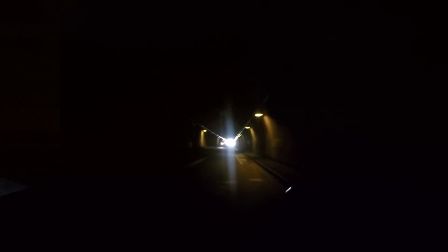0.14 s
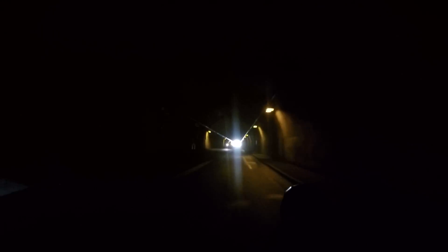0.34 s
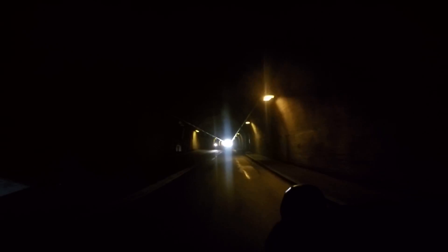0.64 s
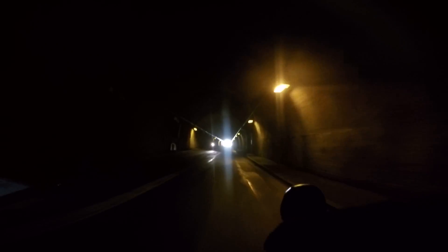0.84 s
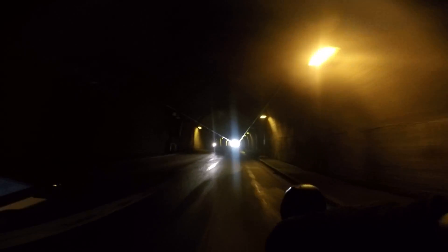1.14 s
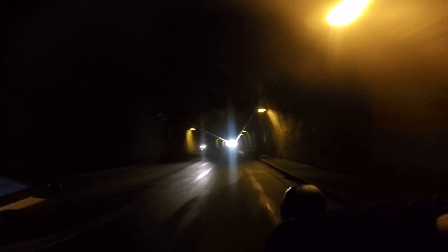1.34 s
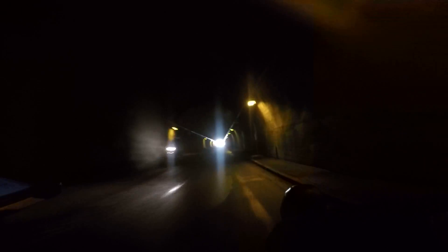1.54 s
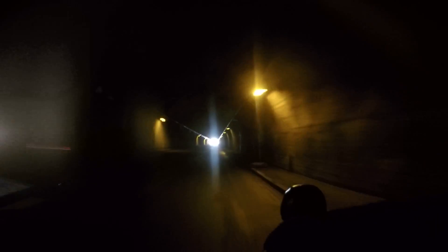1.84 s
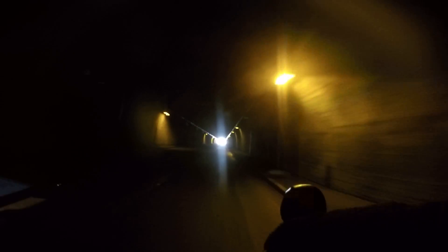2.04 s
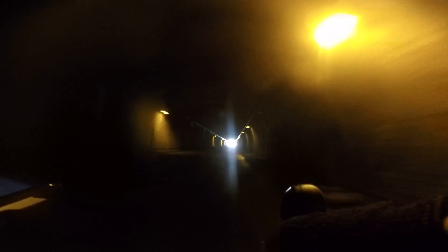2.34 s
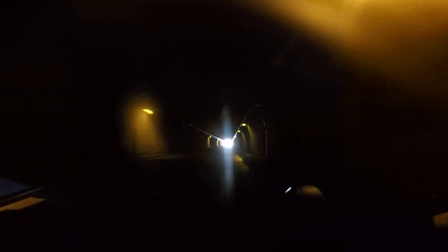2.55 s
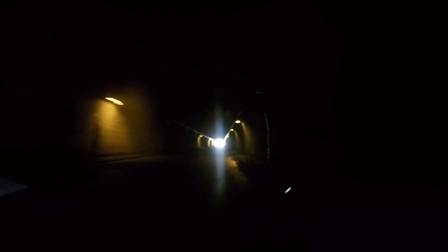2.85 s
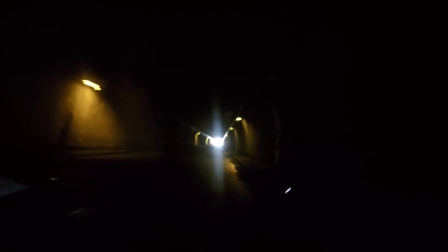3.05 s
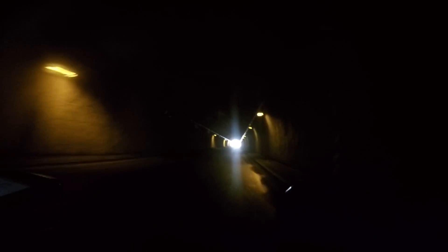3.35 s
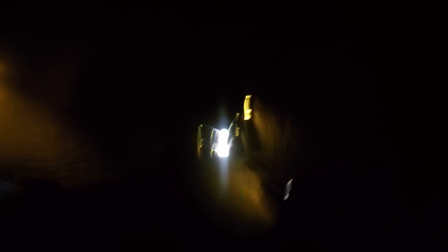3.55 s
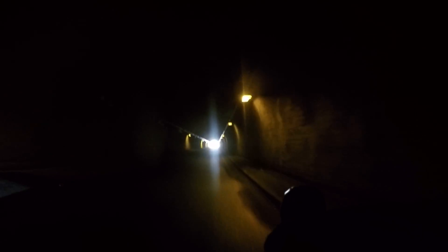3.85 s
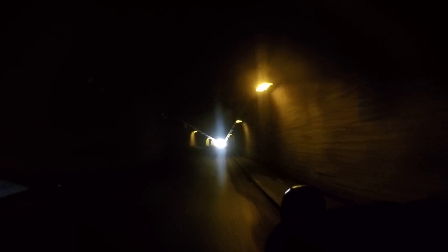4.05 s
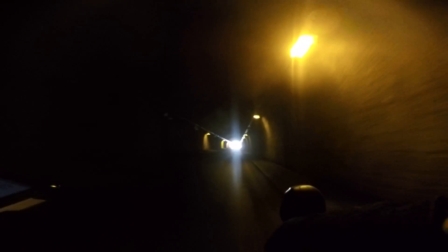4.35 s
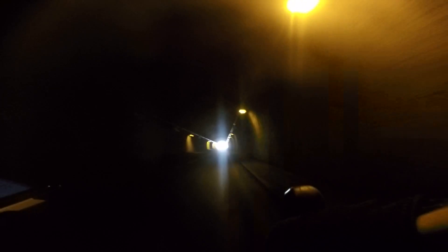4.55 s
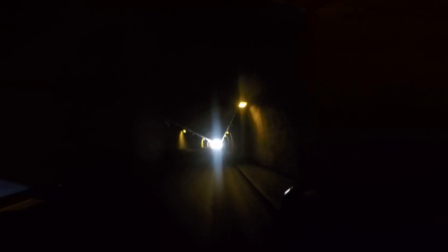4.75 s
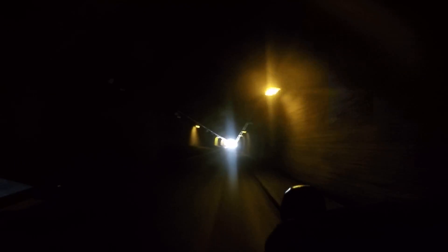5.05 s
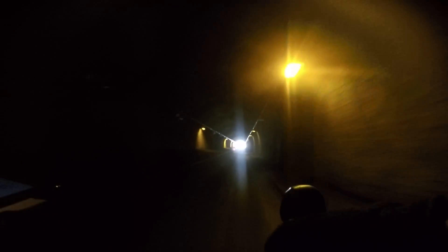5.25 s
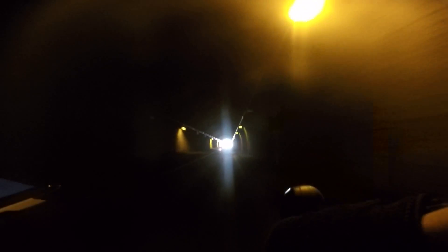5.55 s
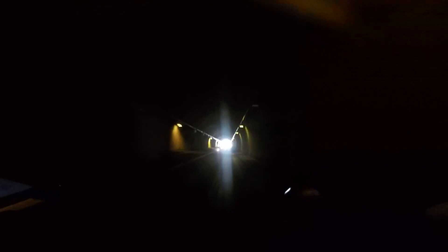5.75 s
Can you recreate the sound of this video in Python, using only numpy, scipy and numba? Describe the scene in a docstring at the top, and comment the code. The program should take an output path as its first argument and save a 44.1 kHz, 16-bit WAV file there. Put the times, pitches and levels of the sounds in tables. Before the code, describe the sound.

Close, muffled low engine shudder and hollow tunnel rumble, faint tyre hiss from oncoming cars, and one hard double clack over a bump.

```python
"""Motorcycle in a road tunnel

A motorcycle rides through a tunnel, heard from a camera in a case on the handlebar.
Noise in a roar and a boom band rings the case, with tyre hiss above it; oncoming cars add to it and sizzle.
The engine shakes the mount: a gliding low tone surges into a throb, and airy treble flares with its cycles.
Both wheels cross one bump: low swings, thumps, clacks and rattles; a gain control ducks, then recovers."""
import sys
import numpy as np
from scipy import signal
from scipy.fft import rfft, irfft, next_fast_len
from scipy.io import wavfile
from scipy.ndimage import uniform_filter1d
from numba import njit

SR = 44100
rng = np.random.default_rng(int(sys.argv[2]) if len(sys.argv) > 2 else 0)


def unload_wav(signal):
    """Save mono or channel-first audio to the path in sys.argv[1] as 16-bit WAV at rate SR, clipped to [-1, 1]."""
    wavfile.write(
        sys.argv[1],
        SR,
        np.round(np.clip(np.atleast_2d(signal).T, -1, 1) * 32767).astype(np.int16),
    )


N = 259749
T = np.arange(N) / SR  # s


def undb(db):
    """Decibels to gain."""
    return 10 ** (np.asarray(db) / 20)


def unit(x):
    """Scale to rms 1."""
    return x / np.sqrt(np.mean(x ** 2))


def colour(x, points, peaks=(), tilt_db=0):
    """Minimum-phase filter from a spectrum, resonant lifts and a tilt per octave (flat below 250 Hz)."""
    size = next_fast_len(len(x) // 2 + 2048, True) * 2
    f = np.maximum(np.arange(size // 2 + 1) * SR / size, 1)
    hz, db = np.transpose(points)
    db = np.interp(np.log(f), np.log(hz), db)
    db = db + tilt_db * np.log2(np.maximum(f, 250) / 1000)
    for centre, width, lift in peaks:
        db = db + lift * 2 ** -((2 * (f - centre) / width) ** 2)
    # folding the cepstrum makes the filter causal
    cepstrum = irfft(np.log(undb(db)))
    cepstrum[1:size // 2] *= 2
    cepstrum[size // 2 + 1:] = 0
    response = np.exp(rfft(cepstrum))
    return irfft(response * rfft(x, size))[:len(x)]


def noise(points, peaks=()):
    """Coloured noise of rms 1, already sounding at the start."""
    white = rng.standard_normal(N + SR // 4)
    return unit(colour(white, points, peaks)[-N:])


def walk(rate_hz):
    """Random levels held 1 / rate_hz s and smoothed twice; spread near 1."""
    k = int(SR / rate_hz)
    steps = np.repeat(rng.standard_normal(N // k + 1), k)
    smooth = uniform_filter1d(uniform_filter1d(steps, k), k)
    return unit(smooth[:N])


def fade(t, t60):
    """Exponential decay that starts at t = 0 and falls 60 dB in t60 s."""
    return (t >= 0) * np.exp(-np.log(1000) * np.maximum(t, 0) / t60)


def swell(s, length):
    """Bell-shaped rise and fall around time s, length wide at half height."""
    return 2 ** -((2 * (T - s) / length) ** 2)


def add(out, s, x):
    """Mix x into out from time s."""
    i = int(s * SR)
    out[i:i + len(x)] += x[:N - i]


# camera case resonances: centre_hz, width_hz, lift_db
CASE = [(131, 100, 2), (218, 24, 2), (276.5, 7.8, 3), (308.5, 22, 5.5), (372, 24, 6.5), (426, 36, 11),
        (527.5, 81, 5), (617.6, 52, 7.5), (743, 47, 5.5), (839, 20, 7.5), (1011.5, 95, 10),
        (1101.5, 75, 11), (1245, 17, 7), (1350, 17, 0), (1920, 19, 2), (2060, 298, 9.5), (2755, 130, 4),
        (3785, 200, 7.5)]
# tunnel roar spectrum: freq_hz, relative_db_per_hz
ROAR = [(40, 8), (100, -2.5), (160, -1.5), (195, -4), (240, -3.5), (340, -8.5), (680, -10.5), (900, -10),
        (1180, -19.5), (1400, -17), (1830, -27.5), (2350, -25.5), (3000, -37.5), (3600, -35.5), (4400, -42),
        (6000, -50), (15000, -67)]
# hollow tunnel boom spectrum: freq_hz, relative_db_per_hz
BOOM_BAND = [(50, -19), (100, -0.5), (150, 9), (180, 3), (260, -13), (600, -45), (5000, -96.5)]
# tyre hiss spectrum: freq_hz, relative_db_per_hz
HISS = [(1000, -14), (2700, 2.5), (3050, 1), (3600, 4.5), (4200, -6), (5600, -16.5), (6700, -16.5),
        (7000, -15), (7300, -21), (10000, -23.5), (14500, -38.5)]
# roar level without cars or flutter: time_s, level_db
ROAR_LEVEL = [(0, -29), (.6, -29), (1.15, -26.5), (1.6, -28.5), (2.2, -26), (2.4, -29), (3.35, -27.5),
              (4.2, -28.5), (5.2, -28), (5.5, -27), (5.65, -28.5), (5.83, -27)]
# boom level without drift: time_s, level_db
BOOM_LEVEL = [(0, -34), (.4, -51), (.75, -36), (1.15, -40.5), (1.6, -51), (2.5, -45.5), (2.85, -35.5),
              (3.05, -40), (3.35, -29.5), (3.7, -49), (4.2, -37), (5.0, -43), (5.5, -38), (5.89, -45)]
OWN_TYRES_DB = -71.5


def tunnel(car_hiss, car_roar, flutter_db=0.3, grain_db=1.13, drift_db=1.7):
    """Engine and tyre noise, smeared by the tunnel into roar and boom, rings the case; tyres hiss above it."""
    roar_db = np.interp(T, *np.transpose(ROAR_LEVEL))
    boom_db = np.interp(T, *np.transpose(BOOM_LEVEL))
    # hypot adds the cars in power
    roar_gain = np.hypot(undb(roar_db), car_roar)
    roar_flicker = undb(flutter_db * walk(21.785) + grain_db * walk(110))
    roar = noise(ROAR, CASE) * roar_gain * roar_flicker
    boom = noise(BOOM_BAND, CASE) * undb(boom_db + drift_db * walk(5.4))
    hiss_gain = np.hypot(undb(OWN_TYRES_DB), car_hiss)
    hiss = noise(HISS, CASE) * hiss_gain * undb(0.95 * walk(22))
    return roar + boom + hiss


# oncoming cars: abreast_s, hiss_db, roar_db (when abreast, before flicker)
CARS = [(0.3, -50, -41), (2.25, -55.5, -39)]
APPROACH_S, RECEDE_S = 2.2, 0.3  # time from half power to abreast, and back


def oncoming():
    """Hiss and roar of the passing cars as gains: they carry far ahead and are soon left behind."""
    power = 0
    for s, hiss_db, roar_db in CARS:
        distance = (T - s) / np.where(T < s, APPROACH_S, RECEDE_S)
        power = power + undb([[hiss_db], [roar_db]]) ** 2 / (1 + distance ** 2)
    return np.sqrt(power)


# top of a close car's tyre noise: freq_hz, relative_db_per_hz
SIZZLE = [(2000, -32), (4500, -5), (5600, -8), (6500, -2), (7000, 1), (7600, -4), (10000, -9), (14500, -18)]
SIZZLE_DB, SIZZLE_APPROACH_S, SIZZLE_RECEDE_S = -68.5, 0.83, .06  # times to half amplitude


def sizzle():
    """The top of a car's tyre noise is heard only close by and dies quickly once the car is past."""
    near = 0
    for s, _, _ in CARS:
        near = near + swell(s, 2 * np.where(T < s, SIZZLE_APPROACH_S, SIZZLE_RECEDE_S))
    return undb(SIZZLE_DB) * near * noise(SIZZLE)


# surges of the throb: peak_s, level_db, length_s, pitch_hz (before flutter and wander)
SWELLS = [(0.031, -11, 0.049, 37.02), (0.071, -10.0, 0.014, 39.73), (0.114, -10, 0.034, 46.9),
          (0.165, -8.5, 0.038, 45.47), (0.288, -10.5, 0.11, 44.77), (0.36, -10, 0.063, 42.76),
          (0.449, -11, 0.065, 44.81), (0.518, -15.5, 0.11, 37.7), (0.604, -11.5, 0.15, 41.44),
          (0.654, -12, 0.047, 37.6), (0.704, -15, 0.022, 36.86), (0.782, -9, 0.092, 42.33),
          (0.868, -7.5, 0.037, 43.48), (0.917, -12, 0.037, 40.48), (1.024, -10.5, 0.13, 42.03),
          (1.193, -12.5, 0.159, 45.48), (1.257, -6, 0.046, 43.28), (1.321, -16.5, 0.032, 49.05),
          (1.349, -19.5, 0.019, 42.26), (1.425, -11.5, 0.073, 46.17), (1.506, -9, 0.13, 44.58),
          (1.693, -8, 0.085, 42.47), (1.78, -10, 0.037, 43.36), (1.824, -9.5, 0.058, 43.7),
          (1.938, -9, 0.05, 47.8), (2.008, -11, 0.038, 37.97), (2.063, -8, 0.036, 42.8),
          (2.128, -8.6, 0.054, 44.34), (2.187, -9.5, 0.18, 44.72), (2.329, -12.5, 0.082, 45.82),
          (2.439, -10.0, 0.12, 42.14), (2.58, -12, 0.046, 43.79), (2.688, -8.5, 0.103, 47.11),
          (2.799, -9, 0.062, 47.6), (2.873, -12.5, 0.16, 42.24), (2.984, -9.8, 0.08, 40.24),
          (3.109, -10, 0.09, 38.04), (3.215, -12.5, 0.042, 43.1), (3.279, -13.7, 0.037, 42.3),
          (3.352, -11, 0.085, 44.15), (3.674, -11, 0.043, 40.54), (3.762, -8, 0.042, 42.55),
          (3.859, -8.5, 0.056, 38.8), (3.924, -8, 0.028, 39.03), (3.983, -10.5, 0.068, 40.34),
          (4.061, -10, 0.071, 42.33), (4.13, -7.5, 0.041, 45.4), (4.175, -7, 0.04, 46.97),
          (4.264, -8, 0.086, 40.05), (4.386, -8.5, 0.041, 44.1), (4.471, -8, 0.054, 41.53),
          (4.537, -5.5, 0.059, 37.1), (4.596, -16, 0.03, 46.83), (4.683, -6.5, 0.069, 40.7),
          (4.741, -3.8, 0.031, 41.06), (4.83, -8.5, 0.15, 41.24), (5.009, -12.5, 0.12, 45.66),
          (5.095, -9.5, 0.065, 42.14), (5.192, -7, 0.063, 40.17), (5.263, -10.5, 0.023, 43.1),
          (5.311, -11, 0.031, 41.66), (5.388, -12.5, 0.076, 39.5), (5.492, -10.5, 0.11, 44.86),
          (5.585, -7.5, 0.061, 39.25), (5.682, -14.5, 0.061, 39.85), (5.726, -15.5, 0.029, 38.8),
          (5.785, -8, 0.048, 46.1), (5.841, -7.5, 0.068, 40.3)]
# air buffeting spectrum: freq_hz, relative_db_per_hz
BUFFET = [(10, -57.5), (20, -22.5), (28, -5.5), (35, 1.5), (48, 3.5), (57, 10), (68, -4.5), (80, -16.5),
          (100, -38.5), (200, -59), (2000, -120)]
SLIP_RAD = 1.8  # phase step, ahead or behind, from one surge to the next


def throb(wander=0.029, flutter_db=1.0, buffet_db=-25):
    """The engine swings the mount in swells that beat against each other, and the air buffets it."""
    times, _, _, pitches = np.transpose(SWELLS)
    slips = SLIP_RAD * np.cumsum(rng.choice([-1, 1], len(SWELLS)))
    size = 0
    for (s, db, length, _), slip in zip(SWELLS, slips):
        size = size + undb(db) * swell(s, length) * np.exp(1j * slip)
    hz = np.interp(T, times, pitches) * (1 + wander * walk(48))
    phase = 2 * np.pi * np.cumsum(hz) / SR
    swing = np.sqrt(2) * np.imag(size * np.exp(1j * phase))
    return swing * undb(flutter_db * walk(90)) + undb(buffet_db) * noise(BUFFET)


# airy treble spectrum: freq_hz, relative_db_per_hz
AIRY_TREBLE = [(1000, -1.5), (5000, 0.5), (7000, -3.5), (10000, -5.5), (14500, -10)]


def treble_flares(shake, full_swing=.5, steepness=2.4, treble_db=-60, patchy_db=0.7):
    """Airy treble noise flares twice per cycle of the throb, stronger in wide swings up to a ceiling."""
    quadrature = np.imag(signal.hilbert(shake))  # largest at mid-swing
    drive = np.minimum(np.abs(quadrature) / full_swing, 1)
    return drive ** steepness * undb(treble_db + patchy_db * walk(40)) * noise(AIRY_TREBLE)


# wheels jolt the mount: start_s, level_db (before envelope), ring_hz, t60_s
JOLTS = [(3.43, 3, 57.8, 0.16), (3.447, 5.5, 38.23, 0.57), (3.587, 10, 33.9, 0.29)]


def jolts():
    """Front and rear wheel set the mount swinging in decaying low sines."""
    out = np.zeros(N)
    for s, db, hz, t60 in JOLTS:
        envelope = fade(T, t60) * (1 - fade(T, 0.037))
        add(out, s, -undb(db) * np.sin(2 * np.pi * hz * T) * envelope)
    return out


# loose parts buzz after each wheel: start_s, level_db (before envelope), t60_s, tilt_db_per_octave
RATTLES = [(3.457, -29.5, 0.59, 2), (3.583, -29.5, 0.24, 4)]


def rattle(swing, sharpness=2, rest=0.58, ticks_per_s=3500):
    """Loose parts tick on, louder each time the jolted mount swings through its rest position."""
    swing_phase = np.angle(signal.hilbert(swing))
    bursts = rest + np.abs(np.sin(swing_phase)) ** sharpness
    ticks = rng.standard_normal(N) * (rng.random(N) < ticks_per_s / SR)
    out = np.zeros(N)
    for s, db, t60, bright_db in RATTLES:
        buzz = unit(colour(ticks, CLACK, (), bright_db))
        out += undb(db) * fade(T - s, t60) * bursts * buzz
    return out


# mount modes left ringing: freq_hz (before scatter), relative_db, t60_s
MOUNT = [(317, 2.5, 0.12), (360, -9, 0.09), (605, -4, 0.049), (762, -2.5, .07), (990, -8.5, 0.02),
         (1415, -11, 0.046), (1806, -7.5, 0.035)]


def ring(t, scatter=0.018):
    """The mount's modes as decaying sines, slightly different in pitch at every blow."""
    out = 0
    for hz, db, t60 in MOUNT:
        mode_hz = hz * (1 + scatter * rng.standard_normal())
        out = out + undb(db) * np.sin(2 * np.pi * mode_hz * t) * fade(t, t60)
    return out


# camera body bottoms out: start_s, level_db (envelope peak), pitch_hz, rise_s
THUMPS = [(3.4529, 4, 322, 0.0024), (3.5765, -1, 507, 0.002), (3.5994, -11.5, 271.5, 0.0068)]


def thumps(ring_db=-22):
    """A soft, heavy contact swells and dies within a few cycles and leaves the mount ringing."""
    out, t = np.zeros(N), T[:SR // 4]
    for s, db, hz, rise_s in THUMPS:
        push = (t / rise_s * np.exp(1 - t / rise_s)) ** 2
        thump = push * np.sin(2 * np.pi * hz * t)
        add(out, s, undb(db) * (thump + undb(ring_db) * ring(t)))
    return out


# mount strikes its stops: start_s, relative_db, tilt_db_per_octave, struck_spot_hz
KNOCKS = [(3.4297, -12.5, -3, 2320), (3.434, -13.5, 2, 1160), (3.4400, -6, 4.5, 5980), (3.442, -2, 4, 2000),
          (3.4515, -6.5, -1.5, 960), (3.454, -3, 1, 1650), (3.4587, 2.5, 1.5, 3880),
          (3.4678, -10.5, 1.5, 1900), (3.4755, -15, -3.5, 780), (3.484, -17.5, -4, 470),
          (3.4955, -17.5, 5, 3700), (3.5072, -20.5, 3, 5570), (3.5106, -19, -4, 3930),
          (3.5245, -17, 4, 805), (3.54, -18, -1.5, 625), (3.564, -23, -6, 400), (3.573, -3, 2, 3920),
          (3.5738, -8, -2, 980), (3.579, -14.5, -1.5, 1920), (3.585, -11.5, 2.5, 5900),
          (3.6007, -11.5, -2.5, 5900), (3.603, -11, -3.5, 840), (3.619, -17.5, -2.5, 1920),
          (3.63, -15.5, -2, 450), (3.648, -25, -4, 960)]
# clack spectrum, shared with the rattle: freq_hz, relative_db_per_hz
CLACK = [(60, -21), (200, -7), (330, 0.5), (600, 1.5), (1100, 1), (1800, -7.5), (2400, -13.5),
         (2950, -18.5), (3800, -18), (4300, -23.5), (4900, -32.5), (5900, -32), (8000, -40), (10200, -34.5),
         (11500, -41.5), (15000, -44)]
KNOCK_DB = 0.5  # gain on all knocks together
CONTACT_S, CONTACT_OCT_PER_DB = 0.017, 0.3755  # contact t60 at zero tilt; brighter is shorter


def knocks(ring_db=-17, case_share=0.15, spot_db=11, spot_width=0.18, rise_s=0.0012):
    """The mount clacks against its stops in coloured noise bursts, and rings."""
    out, t = np.zeros(N), T[:SR // 4]
    case = [(hz, width, case_share * db) for hz, width, db in CASE]
    for s, db, bright_db, spot_hz in KNOCKS:
        contact_t60 = CONTACT_S * 2 ** (-CONTACT_OCT_PER_DB * bright_db)
        contact = fade(t, contact_t60) * (1 - fade(t, rise_s))
        # every struck spot favours its own pitch
        peaks = case + [(spot_hz, spot_width * spot_hz, spot_db)]
        burst = rng.standard_normal(len(t)) * contact
        clack = unit(colour(burst, CLACK, peaks, bright_db)) * np.sqrt(np.mean(contact ** 2))
        add(out, s, undb(db) * (clack + undb(ring_db) * ring(t)))
    return undb(KNOCK_DB) * out


def scene():
    """Everything that reaches the one microphone."""
    background = tunnel(*oncoming()) + sizzle()
    shake, swing = throb(), jolts()
    bump = swing + knocks() + thumps() + rattle(swing)
    return (background + shake + treble_flares(shake) + bump)[None]


@njit
def follow(x, attack, release):
    """Peak follower: climbs quickly, sinks by a steady number of dB a second."""
    out, e = np.empty(len(x)), 0.
    for i in range(len(x)):
        e += attack * max(abs(x[i]) - e, 0.) - release * e
        out[i] = e
    return out


TOP_HZ = 15200


def record(dry, top=0.61, attack_s=0.0086, release_s=1.95):
    """Gain control ducks peaks above top and recovers slowly; overload is rounded off, the treble cut."""
    peak = follow(dry[0], 1 / (attack_s * SR), 1 / (release_s * SR))
    held = dry * top / np.maximum(peak, top)
    rounded = held / (1 + (held / .97) ** 6) ** (1 / 6)
    ease_out = np.minimum((T[-1] - T) / .004, 1)
    lowpass = signal.ellip(10, .2, 80, TOP_HZ, fs=SR, output="sos")
    return signal.sosfilt(lowpass, rounded * ease_out)


dry = scene()
out = record(dry)
unload_wav(out)
```